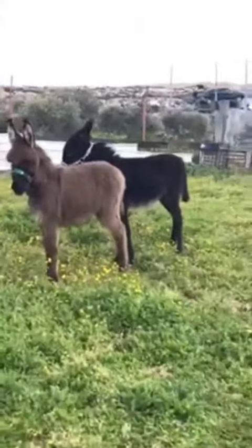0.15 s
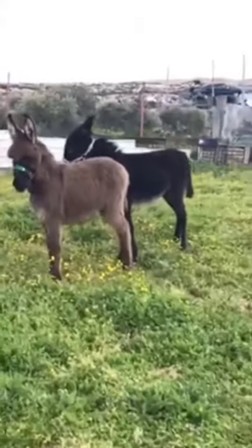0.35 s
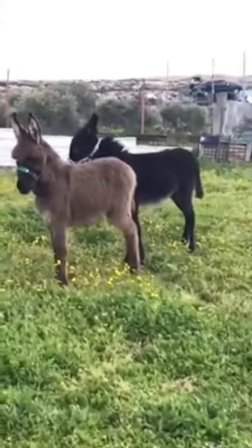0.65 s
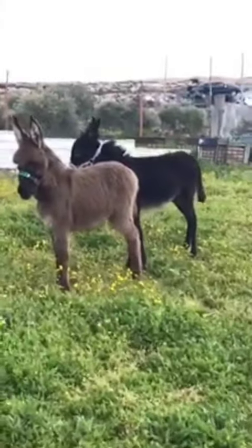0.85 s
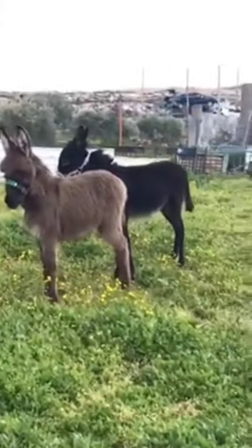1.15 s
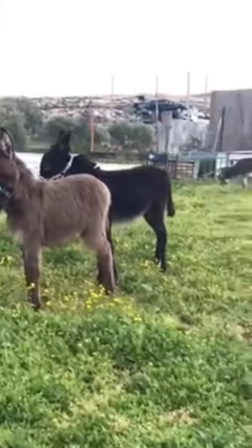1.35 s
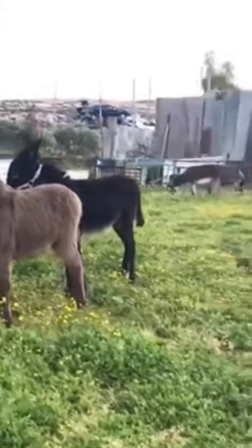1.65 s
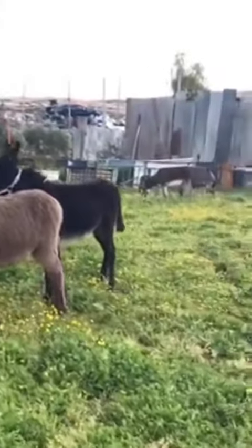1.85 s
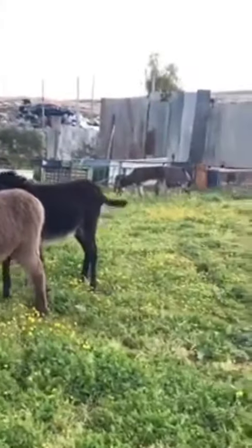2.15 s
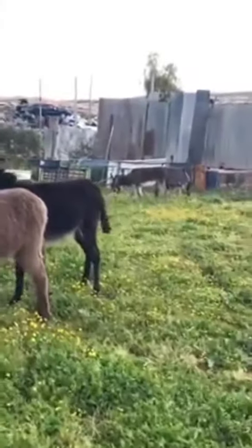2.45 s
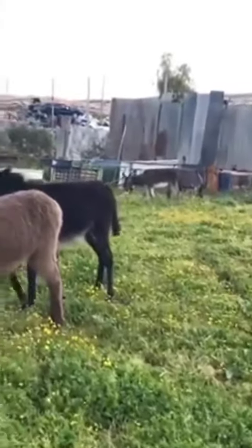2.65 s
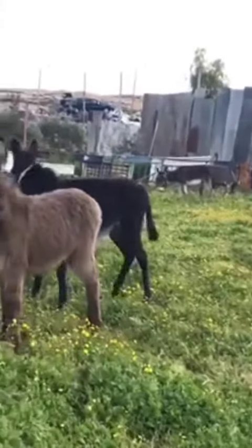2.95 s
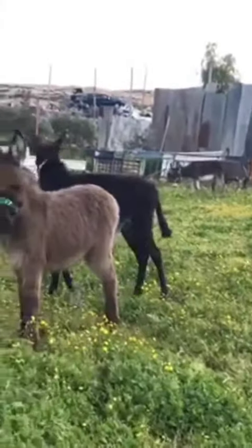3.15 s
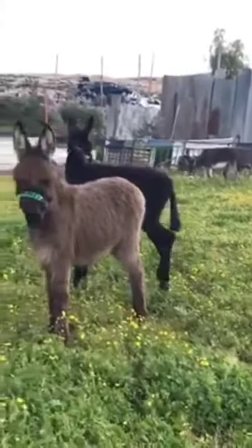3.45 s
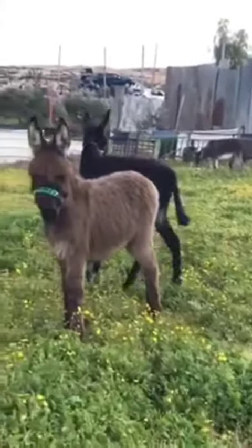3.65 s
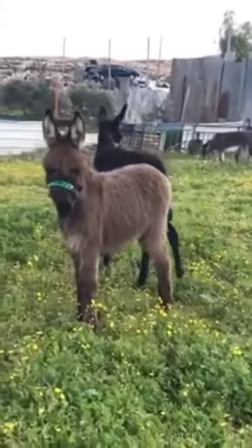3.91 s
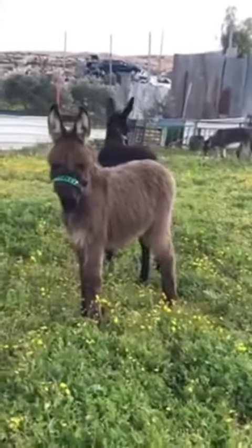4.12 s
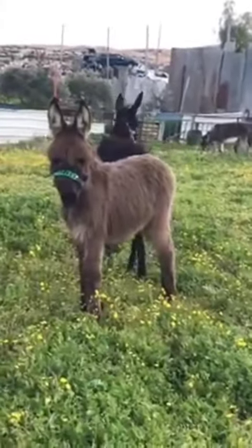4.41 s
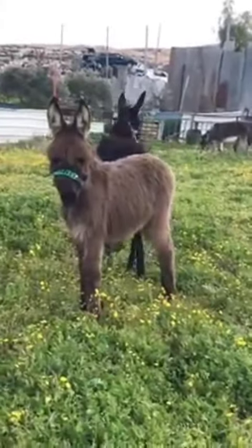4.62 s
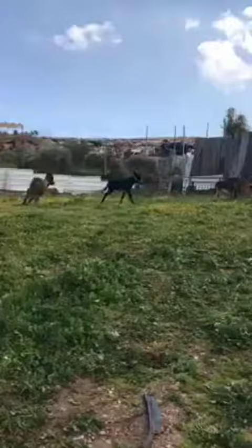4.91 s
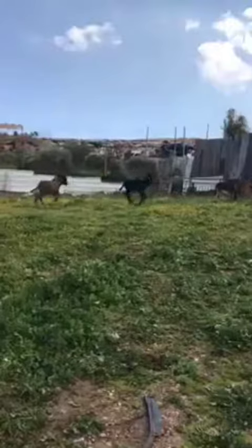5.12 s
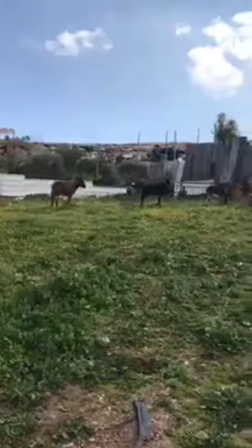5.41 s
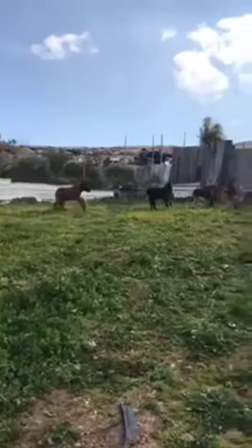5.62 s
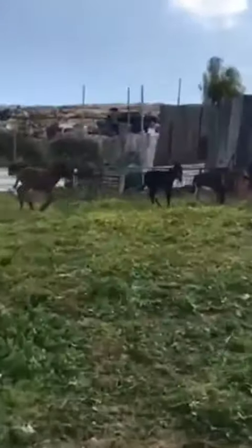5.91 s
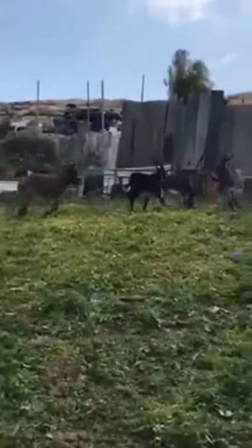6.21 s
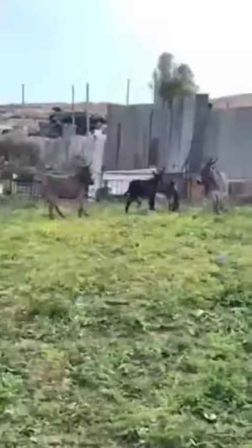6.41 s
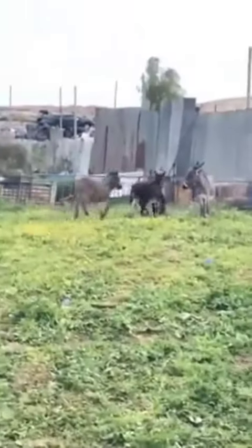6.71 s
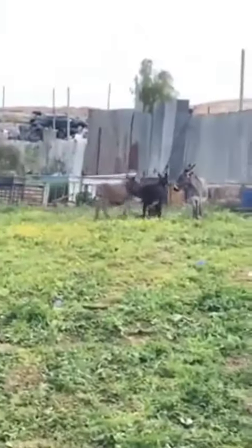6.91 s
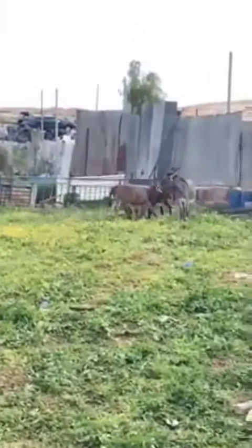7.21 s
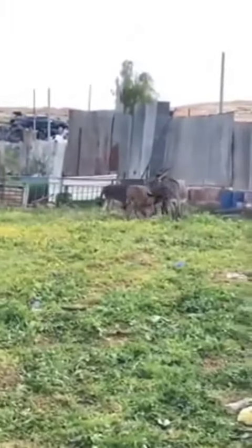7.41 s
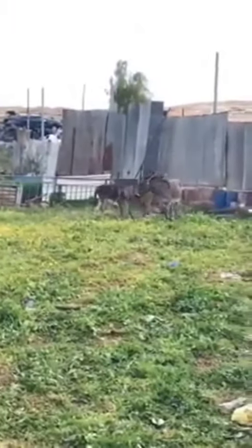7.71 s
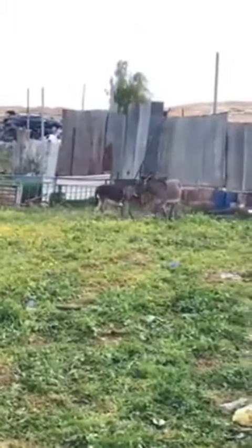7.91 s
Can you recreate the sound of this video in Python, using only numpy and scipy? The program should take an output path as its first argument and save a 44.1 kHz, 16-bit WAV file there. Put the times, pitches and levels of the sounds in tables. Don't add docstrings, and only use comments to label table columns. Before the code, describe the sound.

Rough donkey haws, growls and squeals with creaky in-breaths over wind rumble, then an abrupt cut to distant rooster crowing and grass rustles.

```python
import sys
import numpy as np
from scipy import signal
from scipy.fft import rfft, irfft
from scipy.io import wavfile
from scipy.ndimage import uniform_filter1d

SR = 44100
rng = np.random.default_rng(int(sys.argv[2]) if len(sys.argv) > 2 else 0)


def gain_from_decibels(decibels):
    exponent = np.asarray(decibels, float) / 20
    return 10 ** exponent


def store_wav(level_fs):
    pcm = np.round(np.clip(np.atleast_2d(level_fs), -1, 1) * 32767)
    wavfile.write(sys.argv[1], SR, pcm.T.astype(np.int16))


N = 355446

# (time [s], level [dB])
WIND = [(0, -39.5), (.1, -56), (.28, -43.5), (.65, -47), (1.22, -49.5), (1.62, -47.5), (1.86, -41),
        (2.0, -46), (2.66, -42.5), (2.99, -55), (3.16, -43), (3.6, -55), (4.23, -43.5), (4.4, -58.5),
        (5.4, -50), (6.13, -51.5), (6.6, -50), (8.06, -49.5)]
# (frequency [Hz], density [dB per Hz])
FIELDS = [
    [(60, -29.5), (110, 6), (250, -1), (400, -8.5), (650, -4.5), (1000, -11.5), (1300, -18), (2000, -26.5),
     (3200, -29.5), (6300, -33.5), (8300, -40), (10000, -37.5), (12000, -48), (15800, -52)],
    [(60, -1), (110, -5.5), (250, 2), (400, -5.5), (650, -5), (1000, -4), (1400, -13), (2000, -23),
     (3200, -28), (6300, -33), (8300, -39.5), (10000, -37.5), (12000, -43.5), (15800, -50)],
]
FIELDS_DB = [-54.5, -55]
# (time [s], level [dB], centre [Hz])
RUSTLES = [(2.2999, -59.5, 3530), (3.2046, -55, 3530), (3.24, -61, 3810), (5.5774, -53, 2530),
           (6.4747, -55, 3040), (7.0983, -59, 3000), (7.4094, -58.5, 3700), (7.4503, -59, 6340),
           (7.8785, -55, 2530), (7.9248, -49, 3500), (7.952, -44.5, 3250), (7.975, -51.5, 4300),
           (7.9833, -67, 4630), (8.0176, -63, 2730)]
SPLICE_S = [4.556, 5.1465, 5.199, 5.245]

# (time [s], pitch [Hz], level [dB])
CROWS = [
    [(1.4, 870, -33), (1.5, 941, -42), (1.72, 917, -60)],
    [(5.24, 683, -47), (5.28, 746, -52.5), (5.3, 815, -50.5), (5.37, 845, -45.5), (5.46, 843, -60)],
    [(5.49, 784, -40), (5.52, 930, -51), (5.56, 940, -44), (5.6, 822, -36.5)],
    [(5.61, 794, -31), (5.635, 890, -44), (5.77, 930, -46.5), (5.88, 879, -42), (5.96, 885, -47),
     (6.08, 862, -44)],
    [(5.96, 831, -43), (6.0, 688, -59), (6.09, 754, -48.5)],
    [(6.06, 845, -53), (6.16, 858, -50.5), (6.26, 863, -45.5), (6.29, 864, -45.5), (6.33, 860, -45.5),
     (6.365, 863, -49.5), (6.4, 860.6, -47.5), (6.46, 861, -53), (6.5, 847, -51)],
    [(6.49, 860, -47), (6.525, 863, -42.5), (6.56, 854, -50), (6.58, 855.3, -46.5), (6.63, 858.8, -48),
     (6.66, 867, -57), (6.72, 853, -46), (6.79, 850, -50), (6.8, 848, -53)],
    [(6.79, 839, -53), (6.85, 845, -47.5), (6.88, 839, -49), (6.92, 838, -56), (6.95, 819, -60),
     (7.09, 834, -64)],
    [(6.87, 840, -48.5), (6.895, 777, -56), (6.915, 700, -60.5)],
]
# (rasp [0-1], second partial over the beak's colour [dB])
CROW_MANNER = [(0.62, -7), (0.36, -3), (0.47, -8), (0.63, -5.5), (0.16, -3), (0.09, 1.5), (0.04, -1),
               (0.06, 3), (0.18, -15)]
CROW_UPPER_DB = [-18.5, -21]
CROW_RASP_DB = [-25, -1]
# (frequency [Hz], level [dB])
BEAK = [(700, -0.5), (790, -6), (860, -13.5), (930, -11.5), (1420, -19), (1600, -12.5), (1720, -10.5),
        (1860, -8.5)]

# (start [s], length [s], level [dB], first pitch [Hz], last pitch [Hz])
BARKS = [(0, 0.026, -30, 678.4, 725), (0.229, 0.0255, -50, 693, 720), (0.331, 0.064, -50, 716, 735),
         (0.4, 0.055, -49, 724, 700), (0.47, 0.038, -33.5, 679.7, 720), (0.502, 0.035, -25.5, 703, 727),
         (0.528, 0.036, -29, 714, 798), (0.561, 0.0092, -34, 790, 750), (1.355, 0.028, -35.5, 710, 728),
         (1.377, 0.015, -26, 697, 706), (1.386, 0.043, -27.5, 722, 777), (1.433, 0.027, -42, 827, 827),
         (1.972, 0.025, -32.5, 676, 715), (1.994, 0.019, -28.5, 676, 696), (2.014, 0.028, -34, 690, 680),
         (2.034, 0.0292, -25.5, 704, 710), (2.053, 0.021, -25, 717, 716), (2.069, 0.015, -27.5, 697, 698),
         (2.081, .012, -31.5, 700, 700), (2.095, 0.03, -34.5, 693, 725), (3.684, 0.063, -55.5, 627, 656),
         (3.738, 0.018, -50.5, 670, 664), (3.77, 0.048, -33, 636, 651.5), (3.816, 0.021, -45, 660, 687),
         (3.851, 0.025, -42.5, 656, 671), (4.367, 0.052, -28, 640.4, 783), (4.413, 0.037, -29.5, 736, 788)]

# (time [s], pitch [Hz])
FOLDS = [
    [(0, 235), (.03, 195), (.06, 262), (.085, 245), (.12, 170), (.15, 137), (.19, 128), (.24, 95)],
    [(.51, 69), (.7, 69), (.755, 180), (.795, 192), (.83, 280), (1.05, 310), (1.19, 298), (1.3, 240),
     (1.37, 130)],
    [(1.695, 56), (1.79, 56), (1.85, 65), (1.94, 67), (1.96, 103), (2.04, 104), (2.08, 116), (2.24, 100)],
    [(2.432, 42), (2.52, 42), (2.57, 53), (2.7, 53)],
    [(2.891, 29), (3.0, 20), (3.04, 30), (3.13, 30)],
    [(4.08, 45), (4.19, 46), (4.22, 57), (4.26, 58), (4.35, 94), (4.372, 96)],
    [(4.362, 160), (4.4, 180), (4.459, 189), (4.463, 348), (4.58, 402)],
]
# (time [s], effort [dB], gape [-1 shut to 1 wide])
EFFORT = [
    [(0, -28.5, 0.77), (.082, -30.5, 1.11), (.15, -32, 0.32), (.204, -34.5, 0.49), (.25, -59.5, -1.3)],
    [(.51, -45.5, 0.8), (.56, -29, 0.17), (.626, -29, 0.33), (.688, -29.5, 0.011), (.73, -29.5, 0.49),
     (.8, -26, 0.74), (1.0, -34, 0.99), (1.326, -27.5, 0.58), (1.38, -40, 0.12)],
    [(1.69, -58.5, 0.94), (1.718, -37.5, 0.54), (1.792, -26.5, -0.049), (1.918, -32, 0.1),
     (1.966, -33, 0.4), (2.05, -32, 0.26), (2.14, -41, 0.34), (2.25, -53.5, -0.92)],
    [(2.43, -47.5, 0.19), (2.51, -39, -0.09), (2.566, -36, 0.054), (2.622, -29.5, -0.6),
     (2.71, -73, -0.076)],
    [(2.885, -57.5, 0.27), (2.967, -44, 0.44), (3.035, -49, 0.55), (3.14, -78, .1)],
    [(4.08, -52, 0.13), (4.115, -45, 0), (4.192, -46, 0.15), (4.236, -34.5, 0.27), (4.3, -33.5, 0.283),
     (4.37, -31, 0.65)],
    [(4.36, -32.5, 0.114), (4.396, -26, 0.32), (4.43, -38.5, 1.19), (4.47, -35, 0.9), (4.555, -41, 1.4)],
]
CHESTS_HZ = [149, 125, 109.6, 69, 59, 88.8, 175]
# (frequency [Hz], level [dB])
THROAT = [(250, -3), (330, 0), (420, -7), (515, -3), (590, -15), (715, -9), (850, -21), (1080, -24),
          (1250, -70)]
OPENING = [1.06, 1.04, 1.05, 1.07, 1.7, 1.12, 1.5]
# (level at gape 0 [dB], gain [dB per gape])
LAYERS = [
    (3, -2),
    (-9.5, 14.5),
    (-18.5, 18),
    (-23, -3),
]
# (mouth [dB], nostrils [dB], first partial [dB], throat in the squeal [dB])
MUZZLE = [(-0.5, 2, 0, 0), (-1.2, -0.8, 1.5, 0), (-2, -6, 3, 0), (2.5, -18, -0.5, 0), (-0.5, -0.5, -2.5, 0),
          (-6, -14, -0.5, 0), (-6, -6.5, -1.5, -5)]
MANNER = [(.22, 0, 0), (.21, 1, .15), (.15, 0, .25), (.25, 0, 0), (.25, 0, 0), (.08, 0, .05), (.13, 0, 0)]
# (frequency [Hz], width [Hz], level [dB])
EARLY_TUBES = [
    [(1300.7, 30, 1.5), (1650, 75, -6.5), (2080, 66, -5), (2480, 110, -20), (2806, 43, -16),
     (3395, 74.1, -28), (4035, 71, -26), (5750, 91, -36)],
    [(1085, 60, -8), (1311, 57, 3), (1670, 17, -1), (2050, 46, 2), (2440, 38, -8.5), (2770, 31, -5.5),
     (3060, 28, -15.5), (3200, 26, -12), (3503, 50, -12.5), (3840, 60, -14.5), (4290, 160, -18),
     (5900, 150, -35)],
    [(1392, 50, 0.5), (1710, 37, -1.5), (2100, 320, -6.5), (2850, 100, -5), (3250, 95, -5),
     (3680, 100, -16.5), (4100, 130, -13), (4620, 95, -29), (5550, 190, -37.5), (6500, 78, -46.5)],
]
# (frequency [Hz], width [Hz], level [dB])
LATER_TUBES = [
    [(1500, 110, -7.5), (2030, 430, -10.5), (3250, 170, -13.5), (3810, 71, -11.5), (5100, 70, -37),
     (5500, 140, -25)],
    [(1060, 150, -5.5), (1670, 46, -12), (2030, 170, -2.5), (2472, 51, -9), (3010, 110, -6),
     (4000, 86, -15)],
    [(1060, 80, 3), (1560, 140, -3), (2100, 34, -5.5), (3530, 112, -15.5), (5240, 290, -42),
     (5760, 150, -33.5)],
    [(1558, 110, -10.5), (2020, 120, -11.5), (2513, 57, -10), (2962, 100, -12.5), (3500, 550, -18.5),
     (4010, 47, -14), (4355, 73, -19.5)],
]
# (time [s], level [dB])
FULLNESS = [(0, -4.5), (.12, -1), (.3, 0.5), (.5, -4), (.71, -10), (.82, -9.5), (.97, -8.5), (1.09, 3.5),
            (1.22, 4.5), (1.26, 0), (1.37, -1.5), (1.7, 0), (1.93, -3), (2.0, -1.5), (4.0, -9),
            (4.345, -11), (4.37, -4)]
# (time [s], frequency [factor])
FLARE = [(0, .98), (.8, .985), (1.1, .965), (1.35, .935), (1.72, .89), (1.9, 0.94), (2.05, 1.0),
         (4.1, 1.019), (4.4, 1.02)]
# (frequency [Hz], width [Hz], depth [0-1])
NASAL_DIPS = [(1900, 76, 0.5), (2740, 61, 0.95), (4850, 190, 1), (3240, 41, 0.8), (4000, 34, .6),
              (5170, 33, 0.2)]
# (frequency [Hz], density [dB per Hz])
BREATH = [(500, -29.5), (800, 0.5), (1300, 10), (2200, -10.5), (3500, -6.5), (4400, -21), (5000, -34.5),
          (8000, -65.5)]
# (frequency [Hz], density [dB per Hz])
AIR = [(3500, -27), (4500, -2.5), (6000, -7), (8000, -18.5), (11500, -24.5), (12300, -53)]
# (time [s], peak [dB], ring [Hz])
CREAKS = [(2.456, -35.5, 1999), (2.479, -29.5, 2030), (2.503, -27, 2050), (2.569, -36.5, 2030),
          (2.527, -49, 2100), (2.551, -41.5, 2105), (2.625, -42.5, 2001), (2.651, -46, 1970),
          (2.9516, -46, 1680), (2.9995, -40, 2020), (3.028, -43, 2355), (2.888, -49, 1670),
          (2.926, -45.5, 2300), (2.968, -40, 2330), (3.019, -47.5, 2100), (3.051, -39, 2320),
          (4.229, -39, 1560), (4.293, -39, 1470), (4.105, -45, 1660), (4.13, -41.5, 2050),
          (4.155, -44, 2060), (4.156, -45, 1608), (4.176, -44.5, 2080), (4.177, -40, 1560),
          (4.2465, -44, 1560), (4.278, -43.5, 1520), (4.315, -42, 1590), (4.329, -39.5, 1230),
          (4.351, -37.5, 1504), (4.197, -45, 2020), (1.711, -43, 1386), (1.7308, -28, 2130),
          (1.7484, -28, 1378), (1.7828, -33.5, 2160), (1.8345, -33.5, 1460), (1.864, -34, 1410),
          (1.949, -29.5, 970), (1.9697, -33, 1070), (1.992, -36.5, 982), (2.011, -30, 954),
          (2.048, -31.5, 1050), (2.072, -32, 1060), (2.1, -35.5, 1076), (.438, -55, 4140),
          (2.137, -36, 2080)]
# (time [s], level [dB])
KNOCKS = [(1.711, -39.5), (1.73, -39), (1.948, -39), (2.568, -43), (2.89, -48), (2.926, -43), (2.969, -43),
          (2.977, -44), (3.004, -48), (3.019, -44), (3.073, -46), (3.089, -49), (3.108, -56)]
# (start [s], length [s], level [dB])
SNIFFS = [(0.265, 0.2, -59), (0.447, 0.14, -57), (2.202, 0.209, -65.5), (3.095, 0.2, -70.5)]
# (frequency [Hz], density [dB per Hz])
SNIFF = [(1200, -10.5), (1800, 5), (2600, -9), (4000, -9), (5000, -13), (8000, -22.5), (11800, -37)]
# (time [s], frequency [Hz], level [dB])
WHISTLE = [(4.46, 1370, -51.5), (4.472, 1392, -37), (4.52, 1505, -39.5), (4.556, 1580, -52)]


def evened(x):
    return x / np.sqrt(np.mean(x ** 2) + 1e-20)


def along(rows, t):
    s, *columns = np.transpose(rows)
    return [np.interp(t, s, c) for c in columns]


def add(mix, s, sound):
    part = mix[round(s * SR):][:len(sound)]
    part += sound[:len(part)]


def laid(voice, *tables):
    track = np.zeros(N)
    for row in zip(*tables):
        add(track, *voice(*row))
    return track


def wander(count, hz):
    b, a = signal.butter(2, hz, fs=SR / 32)
    knots = signal.lfilter(b, a, rng.standard_normal(count // 32 + 40))[38:]
    return np.interp(np.arange(count) / 32, np.arange(len(knots)), evened(knots))


def resonate(x, hz, width):
    return signal.lfilter(*signal.iirpeak(hz, hz / width, fs=SR), x)


def slide(x, hz, width):
    turn = np.exp(2j * np.pi * np.cumsum(hz) / SR)
    r = np.exp(-np.pi * width / SR)
    return 2 * (turn * signal.lfilter([1 - r], [1, -r], x / turn)).real


def steep(x, order, hz, kind):
    return signal.sosfilt(signal.butter(order, hz, kind, fs=SR, output="sos"), x)


def coloured(points, count, patchy_db):
    hz = np.fft.rfftfreq(1024, 1 / SR)
    a, b, patches = rng.standard_normal((count // 256 + 5, 513, 3)).T
    patches = evened(uniform_filter1d(uniform_filter1d(patches, 12, 0), 14, 1))
    f, db = np.transpose(points)
    shape_db = np.interp(np.log(hz + 1), np.log(f + 1), db)[:, None]
    bins = (a + 1j * b) * gain_from_decibels(shape_db + patchy_db * patches)
    return evened(signal.istft(bins, nperseg=1024, noverlap=768)[1][:count])


def echoes(x, t60, every_s, first_s, dull_hz):
    at = np.arange(first_s, 1.4, every_s)
    at = at + every_s * rng.random(len(at))
    taps = np.zeros(2 * SR)
    taps[(at * SR).astype(int)] = rng.standard_normal(len(at)) * gain_from_decibels(-60 * at / t60)
    taps = signal.lfilter(*signal.butter(1, dull_hz, fs=SR), taps)
    return signal.fftconvolve(x, taps / np.linalg.norm(taps))[:N]


def field():
    t = np.arange(N) / SR
    rumble = evened(resonate(resonate(rng.standard_normal(N), 59.3, 22), 65.2, 54))
    first, second = (gain_from_decibels(db) * coloured(points, N, patchy_db=1.5) for points, db in zip(FIELDS, FIELDS_DB))
    return gain_from_decibels(along(WIND, t)[0] + 2.0) * rumble + np.where(t < 5, first, second)


def rustle(s, db, hz):
    t = np.arange(0, .05, 1 / SR)
    puff = resonate(rng.standard_normal(len(t)), hz, 3900) * np.exp(-t / 0.021)
    return s, gain_from_decibels(db - 6.5) * puff / abs(puff).max()


def crow(rows, manner):
    t = np.arange(rows[0][0], rows[-1][0], 1 / SR)
    hz, level_db = along(rows, t)
    rasp, lift_db = manner
    first_db = level_db + along(BEAK, hz)[0]
    second_db = level_db + lift_db + along(BEAK, 2 * hz)[0]
    levels_db = [first_db, second_db]
    levels_db += [second_db + db + rasp_db * rasp for db, rasp_db in zip(CROW_UPPER_DB, CROW_RASP_DB)]
    turns = np.cumsum(hz * (1 + 0.041 * rasp * wander(len(t), 86))) / SR
    tone = sum(gain_from_decibels(db) * np.sin(2 * np.pi * (k + 1) * turns) for k, db in enumerate(levels_db))
    flutter = (1 + .15 * wander(len(t), 12.4)) * gain_from_decibels(3.5 * rasp * wander(len(t), 45))
    return t[0], np.sqrt(2) * tone * flutter * signal.windows.tukey(len(t), .1)


def bark(start, length, db, first_hz, last_hz):
    t = np.arange(0, length, 1 / SR)
    hz = first_hz + (last_hz - first_hz) * t / length
    phase = 2 * np.pi * np.cumsum(hz * (1 + 0.026 * wander(len(t), 100))) / SR
    second_db = np.interp(hz, (640, 720), (-20, -28))
    third_db = np.interp(hz, (640, 720), (-37.5, -42.5))
    tone = np.sin(phase) + gain_from_decibels(second_db) * np.sin(2 * phase) + gain_from_decibels(third_db) * np.sin(3 * phase)
    halo = evened(steep(rng.standard_normal(len(t)), 4, [540, 950], "band"))
    level = gain_from_decibels(db + 1.5 * wander(len(t), 60)) * signal.windows.tukey(len(t), min(.022 / length, 1))
    return start, level * (np.sqrt(2) * tone + gain_from_decibels(-20) * halo)


def sniff(start, length, db):
    count = round(length * SR)
    return start, gain_from_decibels(db) * coloured(SNIFF, count, patchy_db=3) * signal.windows.tukey(count, .5)


def knock(s, db):
    t = np.arange(0, .02, 1 / SR)
    from_hz, to_hz, fall_s = 2588, 422, .0022
    hz = to_hz + (from_hz - to_hz) * np.exp(-t / fall_s)
    shape = (1 - np.exp(-(t / 0.0007) ** 2)) * np.exp(-t / 0.0032)
    return s, gain_from_decibels(db) * np.sin(2 * np.pi * np.cumsum(hz) / SR) * shape


def creak(s, db, hz):
    t = np.arange(0, .03, 1 / SR)
    puff = evened(steep(rng.standard_normal(len(t)), 4, (2700, 4370), "band")) * np.exp(-t / 0.0051)
    ring = np.sin(2 * np.pi * hz * t) * np.exp(-t / 0.0067)
    rise = 1 - np.exp(-(t / .0024) ** 2)
    return s, gain_from_decibels(db - 2.5) * rise * (ring + gain_from_decibels(-15) * puff)


def whistle():
    t = np.arange(N) / SR
    hz, level_db = along(WHISTLE, t)
    inside = (t > WHISTLE[0][0]) & (t < WHISTLE[-1][0])
    level = inside * gain_from_decibels(level_db + 1.1 * wander(N, 40)) * np.sqrt(2)
    return level * np.sin(2 * np.pi * np.cumsum(hz) / SR)


def nasal(x):
    (flare,) = along(FLARE, np.arange(N) / SR)
    for hz, width, depth in NASAL_DIPS:
        swallowed = slide(x, hz * flare, width) if hz < 3000 else resonate(x, hz, width)
        x = x - min(depth, 1) * swallowed
    return x


def chest_and_throat(hz, turns, hoarse, chest_db, throat_db, full_db, first_db, chest_hz, opening, lifted):
    count, low = len(hz), np.zeros(len(hz))
    split_db = 0.5 - 10 * np.log10(np.maximum(350 / hz, 1.3))
    for k in range(1, int(min(1200 * opening / hz.min(), 24)) + 1):
        chest = chest_db + first_db * (k == 1) - 3.5 - 13 * np.log2(k * hz / chest_hz) ** 2
        throat = throat_db + np.interp(k * hz / lifted, *np.transpose(THROAT)) + split_db
        share = np.clip((k * hz / opening - 200) / 70, 0, 1)
        unrest = hoarse * min((k / 2.2) ** 1.5, 1.4)
        slip = 3.02 + 0.046 * k * k + 1.7 * unrest * wander(count, 55)
        waver_db = 8 * unrest * wander(count, 30)
        off_ring = 0.5 - np.exp(-((k * hz - 512) / 110) ** 2)
        body_db = full_db * np.clip((k * hz - 140) / 50, 0, 1) * off_ring
        level = gain_from_decibels((1 - share) * chest + share * throat + waver_db + body_db)
        low += level * np.sqrt(2) * np.cos(2 * np.pi * k * turns + slip)
    return low


def mouth_tube(drive, tube, jaw, flare, full_db):
    ring = 0
    for k, (f, w, db) in enumerate(tube):
        width = w + f / 70
        if f < 1500:
            mode = slide(drive, f * jaw / jaw.mean(), width)
        elif 2300 < f < 3300:
            mode = slide(drive, f * flare / flare.mean(), width)
        else:
            mode = resonate(drive, f, width)
        level = (-1) ** k * gain_from_decibels(db + .5 * full_db * (f > 2900))
        ring = ring + level * resonate(mode, f, 4 * w + f / 9)
    return ring


def bray(folds, effort, muzzle, manner, tube, chest_hz, opening):
    t = np.arange(folds[0][0], folds[-1][0], 1 / SR)
    count = len(t)
    (hz,), (effort_db, gape) = along(folds, t), along(effort, t)
    (full_db,), (flare,) = along(FULLNESS, t), along(FLARE, t)
    mouth_trim_db, air_trim_db, first_db, squeal_db = muzzle
    rest, shake, growl_air = manner
    chest_db, throat_db, mouth_db, air_db = (effort_db + db + per * gape for db, per in LAYERS)
    throat_db = throat_db + np.interp(hz, (318, 342), [0, -3 + squeal_db])
    lifted = opening * np.interp(hz, (318, 342), [1, 0.95])
    jaw = np.maximum(hz, 170) ** .17

    tremor_per_s, tremor_low_s = 10.9, 1.053
    tremor = shake * 0.002185 * np.maximum(hz - 232, 0)
    hz = hz * (1 - tremor * np.cos(2 * np.pi * tremor_per_s * (t - tremor_low_s)))
    glide = uniform_filter1d(abs(np.gradient(np.log(hz))) * SR, round(.04 * SR))
    sag_db = effort_db.max() - effort_db
    hoarse = np.clip(rest + .018 * np.minimum(glide, 12) + .012 * sag_db, 0, .8)
    turns = np.cumsum(hz * (1 + .07 * hoarse * wander(count, 40))) / SR + .99
    low = chest_and_throat(hz, turns, hoarse, chest_db, throat_db, full_db, first_db, chest_hz, opening, lifted)

    snaps = np.diff(np.floor(turns), prepend=0) * np.sqrt(SR / hz) * gain_from_decibels(2.4 * wander(count, 68))
    gate = evened(0.55 + 0.96 * np.exp(-(turns % 1) / hz / 0.0076)) * gain_from_decibels(1.4 * wander(count, 28.0))
    growl_hz = 110
    hoarse = hoarse + growl_air * np.clip(2 - hz / (growl_hz / 2), 0, 1) ** .5
    drive = (1 - hoarse) ** 2 * snaps + 1.9 * hoarse * gate * rng.standard_normal(count)
    ring = mouth_tube(drive, tube, jaw, flare, full_db)
    hiss = gate * coloured(BREATH, count, patchy_db=5.5)
    mouth = gain_from_decibels(mouth_db + mouth_trim_db) * evened(evened(ring) + gain_from_decibels(-5.5) * hiss)
    air = gain_from_decibels(air_db + air_trim_db - 6.0) * gate * coloured(AIR, count, patchy_db=3.0)
    return t[0], (low + air + mouth) * signal.windows.tukey(count, .04)


def scene():
    rooster = laid(crow, CROWS, CROW_MANNER)
    dog = laid(bark, *np.transpose(BARKS))
    tubes = EARLY_TUBES + LATER_TUBES
    donkey = nasal(laid(bray, FOLDS, EFFORT, MUZZLE, MANNER, tubes, CHESTS_HZ, OPENING)) + whistle()
    for voice, table in [(sniff, SNIFFS), (creak, CREAKS), (knock, KNOCKS)]:
        donkey = donkey + laid(voice, *np.transpose(table))
    first = donkey + gain_from_decibels(-13.0) * echoes(donkey, t60=0.66, every_s=0.0013, first_s=.01, dull_hz=5960)
    bright_dog = dog + gain_from_decibels(11.5) * steep(dog, 6, 1050, "high")
    first += dog + gain_from_decibels(-14.0) * echoes(bright_dog, t60=0.86, every_s=.004, first_s=.02, dull_hz=6030)
    first[5 * SR:] = 0
    second = rooster + gain_from_decibels(-17) * echoes(rooster, t60=0.4, every_s=.003, first_s=0.022, dull_hz=4000)
    return (first + second + laid(rustle, *np.transpose(RUSTLES)) + field())[None]


def gated(x):
    hz, t, z = signal.stft(x, SR, nperseg=512, noverlap=384)
    held_db = 10 * np.log10(uniform_filter1d(abs(z) ** 2, size=24, axis=-1) + 1e-16)
    near_db = np.median([np.roll(held_db, k, axis=-2) for k in range(-3, 4)], axis=0)
    weak = np.clip(-1.55 - (held_db - near_db), 0, 1) * (hz > 2300)[:, None]
    chance = uniform_filter1d(rng.standard_normal((len(t), len(hz))), size=45, axis=0)
    chance = evened(uniform_filter1d(chance, size=2, axis=1)).T
    holes = np.clip(5 * (chance - 1.45), 0, 1) * ((hz > 4200) & (hz < 9000))[:, None]
    muted = np.maximum(weak, holes)
    return signal.istft(z * gain_from_decibels(-24 * muted), SR, nperseg=512, noverlap=384)[1][:, :N]


def top_cut(x):
    return signal.sosfilt(signal.butter(12, 15730, fs=SR, output="sos"), x)


def record(dry):
    t, dry = np.arange(N) / SR, gated(dry)
    edge_hz, edge_db = 11900, -5
    dry = irfft(rfft(dry) * gain_from_decibels(edge_db * (np.fft.rfftfreq(N, 1 / SR) > edge_hz)), N)
    end, stub_in, stub_out, up = SPLICE_S
    takes = np.interp(t, [end, end + .004, stub_out, up], [1, 0, 0, 1])
    dull = signal.sosfilt(signal.cheby2(10, 60, 7200, fs=SR, output="sos"), dry)
    thud = -gain_from_decibels(-51) * np.exp(-abs(t - stub_in) / 0.0018)
    stub = thud + gain_from_decibels(1.5) * dull * np.clip((t - stub_in) / 0.0014, 0, 1)
    stub = stub * (t > stub_in) * np.clip((stub_out - t) / 0.0021, 0, 1)
    return top_cut(takes * dry + stub)


dry = scene()
out = record(dry)
store_wav(out)
```